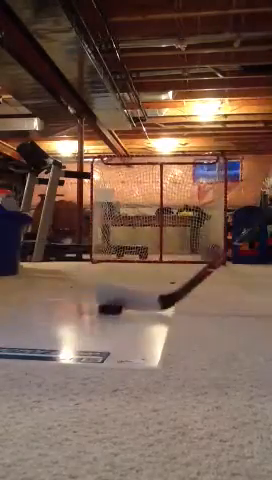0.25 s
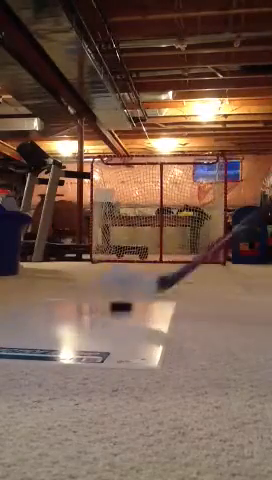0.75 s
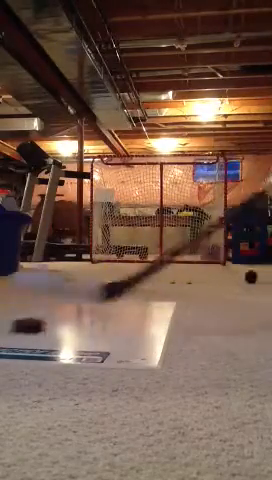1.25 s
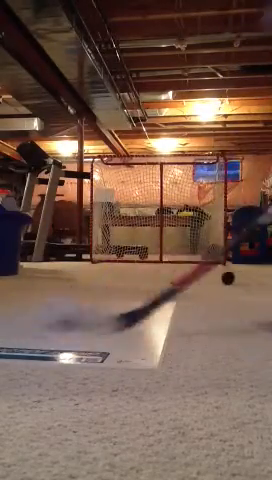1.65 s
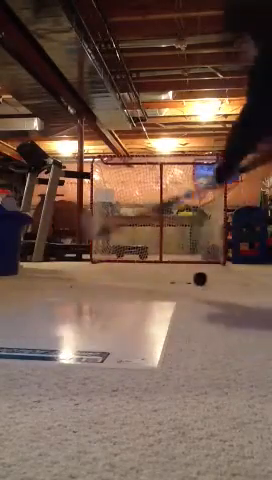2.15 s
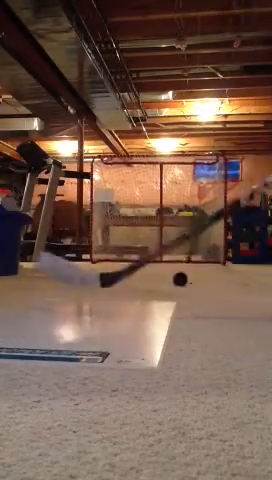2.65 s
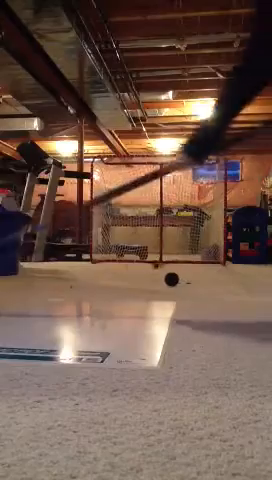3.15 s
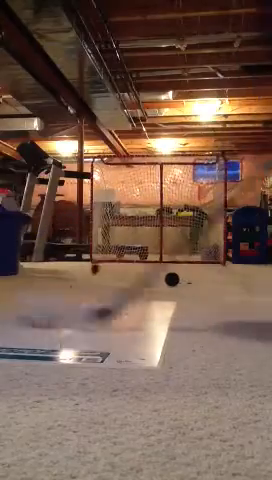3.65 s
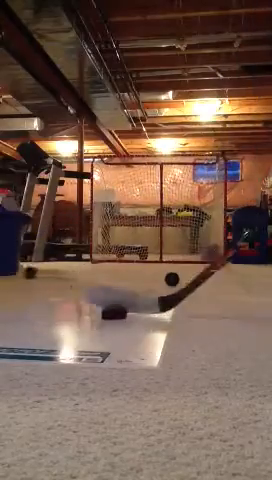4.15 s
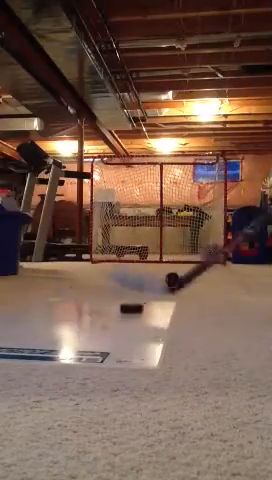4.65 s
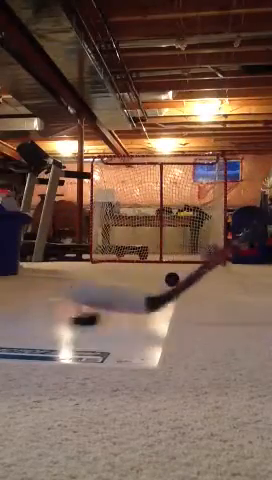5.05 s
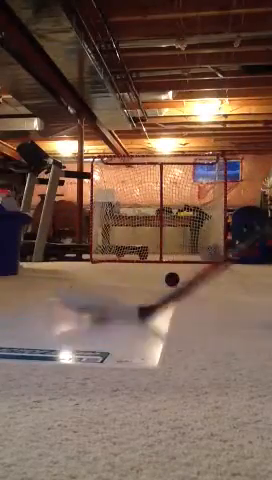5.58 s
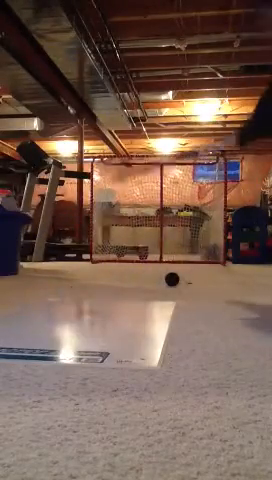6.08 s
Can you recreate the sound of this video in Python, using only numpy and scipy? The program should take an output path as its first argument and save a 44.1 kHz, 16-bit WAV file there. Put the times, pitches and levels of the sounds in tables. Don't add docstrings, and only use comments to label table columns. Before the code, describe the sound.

Hard stick slaps and woody puck knocks alternate quickly in a low, lively basement. A chop and a gritty sweep lead to a shot that rattles the metal goal frame. A loose puck bumps dully farther off, shoes scuff carpet, then a second run of slaps and clacks grows even louder before fading to light scuffs. The phone microphone lies close on the floor; a low furnace hums steadily underneath.

```python
import sys
import numpy as np
from scipy import signal
from scipy.fft import rfft, irfft, next_fast_len
from scipy.io import wavfile
from scipy.ndimage import map_coordinates

SR = 44100
rng = np.random.default_rng(int(sys.argv[2]) if len(sys.argv) > 2 else 0)


def rack_gain(trim_db):
    fader = np.asarray(trim_db, float)
    return 10 ** (fader / 20)


def waveform_to_disk(signal):
    frames = np.transpose(np.atleast_2d(signal))
    scaled = np.clip(frames, -1, 1) * 32767
    samples = np.round(scaled).astype(np.int16)
    wavfile.write(sys.argv[1], SR, samples)


N = 278712
SPAN = SR // 2

# [t/s, crack level/dB, knock level/dB, thud level/dB, thud f/Hz]
FLAT_SLAPS = [
    (0.159, -12, -13.5, -17, 324),
    (0.4927, -11.5, -27, -17.5, 470),
    (0.8583, -15, -22, -25, 325),
    (3.5246, -29.5, -28.5, -33.5, 357),
    (3.647, -12, -16, -21.5, 427),
    (5.2902, -7, -15, -14.5, 400),
    (4.055, -11.5, -16.5, -17, 352),
    (4.757, -12.5, -55.5, -22, 314),
]
# [t/s, crack level/dB, knock level/dB, thud level/dB, thud f/Hz]
EDGE_SLAPS = [
    (0.7016, -33.5, -32, -38, 430),
    (0.7404, -45, -37.5, -36, 370),
    (1.384, -10.5, -8.5, -14, 448),
    (1.714, -30.5, -32.5, -24.5, 427),
    (3.566, -14, -41, -35.5, 493),
    (3.5871, -34, -28.5, -32.5, 437),
    (3.7206, -31, -47.5, -25, 420),
    (4.3863, -7, -10, -12.5, 370),
    (4.4348, -30, -26, -30, 440),
    (5.591, -41, -61, -34.5, 563),
]
# [t/s, crack level/dB, thud level/dB, thud f/Hz]
TAPS = [(1.0684, -47, -47, 465), (1.1128, -44.5, -38.5, 477), (1.562, -55, -37, 410),
        (4.189, -68, -37, 570), (4.5717, -42, -34.5, 600), (4.994, -43, -35.5, 487), (5.052, -43, -38, 436),
        (5.493, -66, -41, 443), (5.564, -48, -38.5, 450), (5.5759, -41, -35, 444), (5.606, -40, -45, 403),
        (5.6688, -36.5, -53, 495), (5.8073, -54, -42.5, 354)]
# [t/s, crack level/dB, knock level/dB, thud level/dB, knock f/Hz]
CLACKS = [
    (0.2162, -47, -10, -22.5, 1150),
    (.575, -21.5, -19.5, -29, 930),
    (0.9068, -27, -15, -36, 1280),
    (3.7381, -27, -6, -19, 1255),
    (4.119, -32, -13.5, -37, 940),
    (4.4713, -26, -11.5, -18, 886),
    (4.8186, -13.5, -7, -19, 1235),
    (5.3962, -44.5, -24, -27.5, 820),
]
# [t/s, crack level/dB, knock level/dB, thud level/dB, pitch factor]
RELEASES = [
    (1.818, -29.5, -23.5, -39, .93),
    (5.732, -37, -29.5, -36.5, 1.08),
]
# [t/s, thud level/dB, thud f/Hz]
BOUNCES = [
    (2.4, -30, 219.6),
    (2.703, -41.5, 213.5),
    (2.756, -46, 222.3),
    (3.372, -43, 550),
    (5.951, -45.5, 453),
    (6.171, -44, 670),
]
# [f/Hz, level/dB, t60/s]
PAD_MODES = [(220.6, 2.5, 0.13), (317.4, 0, 0.1), (409, -1.5, 0.05), (577, -5, 0.029)]
# [multiple of the knock pitch, level/dB, cycles to die]
BLADE_MODES = [(1, 2, 4.65), (1.5, 2, 1.5), (2.3, -15, 6.1), (.6, -17.5, 18)]
# [f/Hz, level/dB, t60/s]
SHAFT_MODES = [(2990, -39, .05)]
# [f/Hz, level/dB, t60/s]
BENT_MODES = [(1250, 0.5, 0.0049), (2030, 5, 0.0033), (2320, -1, 0.0035), (3150, -15, .008)]
# [f/Hz, level/dB]
CRACK_COLOUR = [(1500, -2), (3000, -5.5), (5000, -6), (8000, -3.5), (11500, -5.5), (13500, -12),
                (16000, -22)]
# [t/s, level/dB]
PUFFS = [
    (.1586, -1.5),
    (0.4927, -2),
    (.8585, -8),
    (3.5247, -19.5),
    (3.6472, -8.5),
    (4.0553, -0.8),
    (4.3868, -15),
    (4.7569, -9.5),
    (5.2897, -13),
]
# [f/Hz, level/dB, t60/s]
PORT_MODES = [(11410, 0.5, 0.0038), (12800, 2, 0.0027)]
# [t/s, f/Hz, level/dB, length/s]
SHUDDERS = [(.008, 390, -41, 0.014), (1.697, 331, -42, 0.012), (3.641, 400, -40, 0.0082),
            (5.0975, 474, -40, 0.017), (5.566, 447, -38, 0.017), (0.494, 468, -12, 0.0074),
            (1.714, 467, -21.5, .016), (1.735, 397, -28.5, 0.013), (1.755, 385, -33.5, .01),
            (2.3945, 790, -30, 0.0036), (3.551, 524, -36, .011), (3.65, 467.6, -18.5, .028),
            (3.716, 466, -20.5, 0.024), (4.389, 359, -17.5, 0.02), (4.434, 463, -23, 0.0071),
            (5.705, 638, -32.5, 0.0074)]
# [fastest moment t/s, pad hiss level/dB, carpet scuff level/dB,
# speeding up/s, slowing down/s]
STROKES = [(0.0, -65.5, -65.5, .05, 0.19), (.3, -64, -71, 0.1, 0.097), (1.054, -58.5, -68.5, 0.14, .08),
           (1.25, -62, -74, 0.17, 0.32), (1.721, -46, -51.5, 0.091, 0.044), (1.92, -67.5, -66, 0.052, .05),
           (2.796, -76, -71, 0.013, 0.17), (3.362, -77, -69, 0.042, 0.3), (3.854, -59, -65.5, 0.3, .12),
           (4.2, -64, -67, 0.11, 0.069), (4.56, -60, -74, 0.11, .19), (4.91, -56, -61, 0.1, .12),
           (5.12, -61, -67.5, 0.23, 0.23), (5.61, -45.5, -56.5, 0.071, .065),
           (5.82, -66.5, -71, 0.19, 0.073), (6.1, -62.5, -60, 0.028, 0.16),
           (6.198, -56.5, -57.5, 0.016, 0.035)]
# [f/Hz, level/dB per Hz]
HISS_COLOUR = [(3530, -46.5), (6000, -28), (8580, -20), (9210, -14.5), (9780, -13), (10700, -8),
               (11500, -6), (15500, -23.5)]
# [f/Hz, level/dB per Hz]
SCUFF_COLOUR = [(710, -46), (1200, 6), (2390, 4.5), (3060, 8.5), (3790, 3), (8120, 4.5), (14000, -40)]
# [f/Hz, level/dB per Hz]
GOAL_COLOUR = [(71, -28), (120, -3.5), (503, -7.5), (805, 3), (1190, -2), (2200, -1.5), (2640, -6),
               (3050, -5), (8310, 1), (14700, -13.5), (16000, -55)]
# [f/Hz, level/dB, t60/s]
TUBE_MODES = [(1314, 0, 0.26), (2993, -6, 0.44), (3510, -5, 0.31), (3666, -7, 0.3), (5475, -15, 0.63),
              (5588, -6, 0.26), (7068, -8, 0.27), (8269, -10, 0.34)]
# [t/s, f/Hz, level/dB, length/s]
SQUEAKS = [
    (1.6895, 4950, -43, 0.0019),
    (3.15, 1400, -55.5, 0.0069),
    (5.048, 2000, -40.5, 0.0035),
]
# [t/s, bright level/dB, dull
# level/dB, rise/s, length/s]
FAR_CONTACTS = [(.001, -64, -42.5, 0.00049, 0.013), (1.774, -41.5, -36, .003, 0.033),
                (2.398, -47, -33.5, 0.0035, 0.015), (2.408, -31.5, -24, 0.0023, 0.018),
                (2.459, -29, -36.5, 0.0055, 0.021), (2.781, -44.5, -55.5, 0.0078, 0.04),
                (3.245, -42, -53, 0.0096, 0.019), (3.344, -44.5, -65, 0.005, 0.02),
                (3.381, -44, -45, 0.0014, 0.0041), (6.074, -46, -47.5, 0.0047, 0.02),
                (6.208, -37, -50.5, 0.0039, 0.01)]
# [f/Hz, level/dB per Hz]
BRIGHT_COLOUR = [(880, -20), (1500, -13.5), (1960, -4), (4810, -7.5), (10700, -8), (15000, -23)]
# [f/Hz, level/dB per Hz]
DULL_COLOUR = [(100, -30), (200, -3), (380, -6), (600, -2), (850, 0), (1200, -7), (1800, -15), (2600, -26),
               (4000, -60)]
# [t/s, level/dB]
WALLS = [(.0065, -19.5), (0.011, -0.5), (0.019, -15), (.022, -9.5), (0.03, -23.5)]
# [f/Hz, t60/s, level/dB]
ROOM_TAIL = [(150, 0.52, -7.5), (513, 0.23, 5), (1500, 0.29, 3.5), (4300, 0.27, 5), (8500, 0.22, -1.5),
             (13200, 0.22, 7)]
# [f/Hz, level/dB per Hz]
DRONE_COLOUR = [(15, -74), (25, -53), (97, -5.5), (137, 1.5), (240, -1.5), (282, -14), (368, -10.5),
                (520, -17), (796, -18), (959, -21), (1360, -24.5), (2570, -32), (13400, -35.5),
                (14500, -51.5)]
# [f/Hz, level/dB, width/Hz]
FAN_LINES = [(786, -75, 20), (576, -82, 20)]
# [f/Hz, level/dB]
PHONE_TOP = [(15300, 0), (15600, -26)]
# [f/Hz, level/dB]
PHONE_GATE = [(13000, -120), (13400, -76), (14500, -70), (15100, -68), (15500, -41), (16600, -30)]


def stick():
    out = np.zeros(N + SR)
    usual = 1273
    for rows, room_db in (FLAT_SLAPS, 2.5), (EDGE_SLAPS, 0.5):
        for s, crack_db, knock_db, thud_db, hz in rows:
            blow(out, s, crack_db, knock_db, thud_db, blade(usual), hz, room_db)
    for s, crack_db, thud_db, hz in TAPS:
        knock_db = thud_db - 13.5
        blow(out, s, crack_db, knock_db, thud_db, blade(usual), hz, room_db=6)
    for s, thud_db, hz in BOUNCES:
        crack_db, knock_db = thud_db - 41, thud_db - 44.5
        blow(out, s, crack_db, knock_db, thud_db, blade(usual), hz, room_db=5)
    for s, crack_db, knock_db, thud_db, hz in CLACKS:
        blow(out, s, crack_db, knock_db, thud_db, blade(hz), 380, room_db=0)
    for s, crack_db, knock_db, thud_db, stiff in RELEASES:
        bent = [(stiff * hz, db, t60) for hz, db, t60 in BENT_MODES]
        blow(out, s, crack_db, knock_db, thud_db, bent, 740, room_db=2.5)
    return out[:N]


def blow(out, s, crack_db, knock_db, thud_db, modes, thud_hz, room_db):
    t = np.arange(SR // 6) / SR
    contact = 64 / SR
    late = np.maximum(t - contact, 0)
    tilt_db = np.clip(.2 * (crack_db - knock_db - 13), -6, 0)
    colour = [(hz, db + tilt_db * np.log2(hz / 4000)) for hz, db in CRACK_COLOUR]
    snap = rack_gain(crack_db - 1) * np.pad(click(colour), (0, len(t)))[:len(t)]
    grit = np.exp(-np.abs(t - contact) / .0004) * noise(colour, len(t))
    soft = 1 - np.exp(-(late / 0.00011) ** 2)
    knock = rack_gain(knock_db + 3) * soft * ring(modes, late, scatter_db=1.5)
    push = rack_gain(-60 * late * thud_hz / 7) * np.sin(2 * np.pi * thud_hz * late)
    near = [(hz, db - 9 * abs(np.log2(hz / thud_hz)), t60) for hz, db, t60 in PAD_MODES]
    thud = rack_gain(thud_db) * soft * (push + rack_gain(-5.5) * ring(near, late, scatter_db=2))
    body = knock - thud
    start = s - 40 / SR
    add(out, start, snap + rack_gain(crack_db - 3) * grit + body)
    add(out, start, rack_gain(room_db) * room(snap, early_db=-11, late_db=7.5, build=0.00063))
    add(out, start, rack_gain(room_db) * room(body, early_db=-9, late_db=-2, build=0.001))


def blade(knock_hz):
    return [(k * knock_hz, db, cycles / (k * knock_hz)) for k, db, cycles in BLADE_MODES] + SHAFT_MODES


def puffs():
    out, t = np.zeros(N + SR), np.arange(SR // 100) / SR
    # under its thud, and -30 dB at most
    leaks = [(row[0], min(row[3] - 3.5, -30)) for row in EDGE_SLAPS]
    for s, db in PUFFS + leaks:
        whistle = rack_gain(db) * (1 - np.exp(-(t / 0.00025) ** 2)) * ring(PORT_MODES, t, scatter_db=.5)
        add(out, s, whistle)
        add(out, s - .0004 + WALLS[0][0], rack_gain(-13) * whistle)
    return out[:N]


def shudders():
    out, t = np.zeros(N + SR), np.arange(SR // 12) / SR
    for s, hz, db, length in SHUDDERS:
        rise = 1 - np.exp(-t / 0.00082)
        sag = rack_gain(-6 * t / length)
        stop = np.exp(-np.maximum(t - length, 0) / 0.0032)
        rough = rack_gain(db + 1.6 * wobble(170)[:len(t)])
        turn = 2 * np.pi * hz * t + np.cumsum(.04 * rng.standard_normal(len(t)))
        beating = np.sin(turn) + 0.35 * np.sin(.68 * turn)
        tone = rough * rise * sag * stop * beating
        add(out, s, tone)
        add(out, s, room(tone, early_db=-20, late_db=-9, build=.004))
    return out[:N]


def sliding():
    s, pad_db, carpet_db, rise, fall = np.transpose(STROKES)[:, :, None]
    since = np.arange(N) / SR - s
    power = np.where(since < 0, 1.6, 2.6)
    speed = np.exp(-np.abs(since / np.where(since < 0, rise, fall)) ** power)
    grit_db = 1.2 * wobble(50) + 1.2 * wobble(400)
    hiss = (rack_gain(pad_db) * speed).max(0) * rack_gain(grit_db) * noise(HISS_COLOUR, N)
    effort = (rack_gain(carpet_db) * speed).max(0) + rack_gain(-75)
    return hiss + effort * rack_gain(wobble(30)) * noise(SCUFF_COLOUR, N)


def goal():
    out, t = np.zeros(N + SR), np.arange(SPAN) / SR
    shot_s, shot_db = 2.072, -10
    swell = 1 - .75 * np.exp(-t / .006)
    crash = swell * rack_gain(-60 * t / 0.091 + 1.2 * wobble(700)[:SPAN]) * noise(GOAL_COLOUR, SPAN)
    tubes = rack_gain(-30) * (1 - np.exp(-t / .005)) * ring(TUBE_MODES, t, scatter_db=1)
    hit = click(GOAL_COLOUR)
    hit = hit / np.linalg.norm(hit)
    answer = room(hit, early_db=-3.5, late_db=27.5, build=0.0065, longer=1.25)
    add(out, shot_s, rack_gain(shot_db) * (crash + tubes + answer))
    return out[:N]


def squeaks():
    out, half = np.zeros(N + SR), SR // 40
    t = np.arange(-half, half) / SR
    for s, hz, db, length in SQUEAKS:
        turn = 2 * np.pi * hz * t + np.cumsum(.05 * rng.standard_normal(len(t)))
        tone = np.sin(turn) + 0.27 * np.sin(2 * turn) + .15 * np.sin(3 * turn)
        chirp = rack_gain(db) * np.exp(-(2 * t / length) ** 2) * tone
        add(out, s - half / SR, chirp)
        add(out, s - half / SR, room(chirp, early_db=-14, late_db=-8, build=.008))
    return out[:N]


def far():
    out, t = np.zeros(N + SR), np.arange(SR // 5) / SR
    for s, bright_db, dull_db, rise, length in FAR_CONTACTS:
        shape = (1 - np.exp(-t / rise)) * np.exp(-t / length)
        bright = rack_gain(bright_db - 11) * noise(BRIGHT_COLOUR, len(t))
        dull = rack_gain(dull_db - 3) * noise(DULL_COLOUR, len(t))
        puff = shape * (bright + dull)
        add(out, s, puff)
        add(out, s, room(puff, early_db=-38, late_db=-1.5, build=0.025))
    return out[:N]


def room(x, early_db, late_db, build, longer=1):
    hz, t, z = signal.stft(rng.standard_normal(SPAN), SR, nperseg=256)
    t60 = longer * along(ROOM_TAIL, hz)[:, None]
    decay_db = along(ROOM_TAIL, hz, order=2)[:, None] - 60 * t / t60
    tail = signal.istft(z * rack_gain(decay_db), SR, nperseg=256)[1][:SPAN]
    since = np.arange(SPAN) / SR
    tail = tail * (1 - np.exp(-since / build))
    lumps = np.repeat(rng.standard_normal(SPAN // 48 + 1), 48)[:SPAN]
    tail = tail * rack_gain(3 * lumps * np.exp(-since / .06))
    answer = rack_gain(late_db) * tail / np.linalg.norm(tail)
    for s, db in WALLS:
        answer[round(s * SR)] += rack_gain(db + early_db)
    return signal.fftconvolve(x, answer)[:SPAN]


def furnace():
    lines = sum(rack_gain(db) * noise([(hz - w, -40), (hz, 0), (hz + w, -40)], N) for hz, db, w in FAN_LINES)
    return rack_gain(-55.5 + 0.85 * wobble(8.5)) * noise(DRONE_COLOUR, N) + lines


def unit(x):
    return x / np.sqrt(np.mean(x ** 2) + 1e-20)


def along(points, hz, order=1):
    p = np.transpose(points)
    return np.interp(np.log(hz + 1), np.log(p[0] + 1), p[order])


def wobble(rate):
    knots = rng.standard_normal(int(N * rate / SR) + 4)
    return map_coordinates(knots, [np.arange(N) * rate / SR])


def noise(spectrum, size):
    m = next_fast_len(size + 4096)
    colour = rack_gain(along(spectrum, np.fft.rfftfreq(m, 1 / SR)))
    return unit(irfft(rfft(rng.standard_normal(m)) * colour, m)[:size])


def ring(modes, t, scatter_db):
    total = 0
    for hz, db, t60 in modes:
        level_db = db + scatter_db * rng.standard_normal() - 60 * t / t60
        total = total + rack_gain(level_db) * np.sin(2 * np.pi * hz * t)
    return total


def click(spectrum):
    pulse = np.roll(irfft(rack_gain(along(spectrum, np.fft.rfftfreq(512, 1 / SR)))), 64)
    return pulse / pulse.max()


def add(out, s, x):
    out[round(s * SR):][:len(x)] += x


def scene():
    struck = stick() + puffs() + shudders() + goal() + squeaks() + far()
    struck = signal.sosfilt(signal.butter(5, 125, "high", fs=SR, output="sos"), struck)
    mix = struck + sliding() + furnace()
    return signal.sosfilt(signal.butter(2, 80, "high", fs=SR, output="sos"), mix)[None]


def low_pass(x):
    return signal.sosfilt(signal.butter(12, 16620, fs=SR, output="sos"), x)


def record(dry):
    squeezed = dry / (1 + np.abs(dry / .75) ** 3) ** (1 / 3)
    hz, t, z = signal.stft(squeezed, SR, nperseg=1024)
    band = np.arange(len(hz)) // 16
    power = np.add.reduceat(np.abs(z) ** 2, np.arange(0, len(hz), 16), axis=1) / 16
    level = np.sqrt(power)[:, band]
    is_heard = level > rack_gain(along(PHONE_GATE, hz[band * 16]) - 18)[:, None]
    z = z * rack_gain(along(PHONE_TOP, hz))[:, None] * is_heard
    kept = signal.istft(z, SR, nperseg=1024)[1][:, :N]
    return low_pass(kept)


dry = scene()
out = record(dry)
waveform_to_disk(out)
```